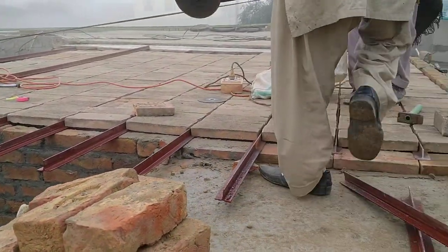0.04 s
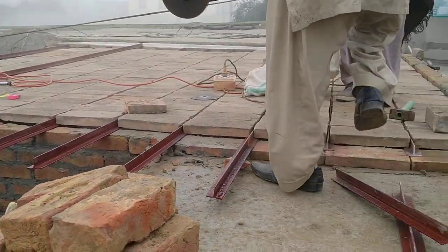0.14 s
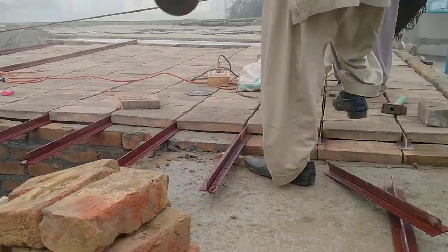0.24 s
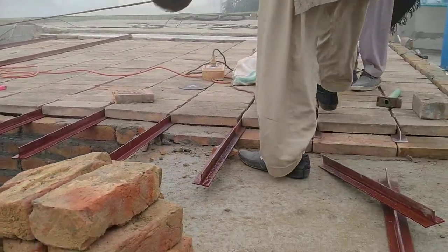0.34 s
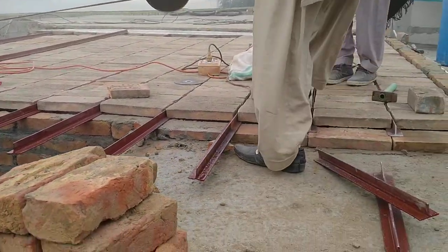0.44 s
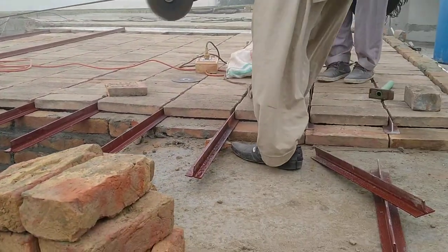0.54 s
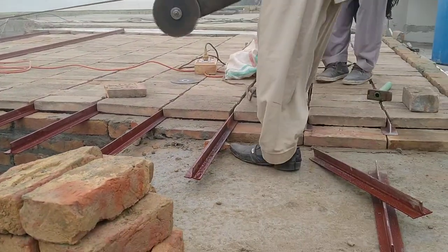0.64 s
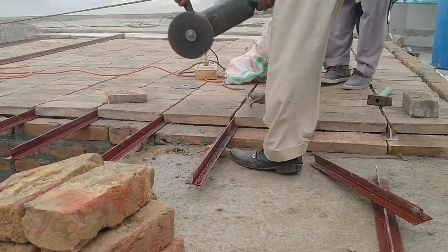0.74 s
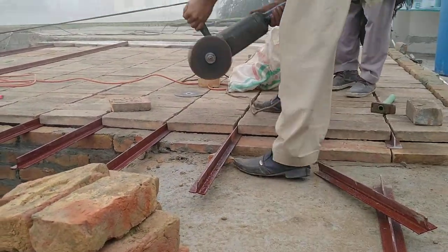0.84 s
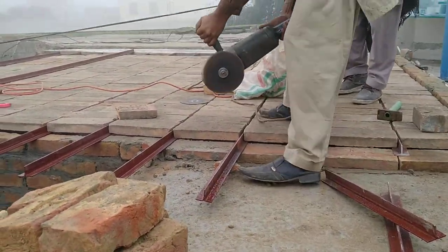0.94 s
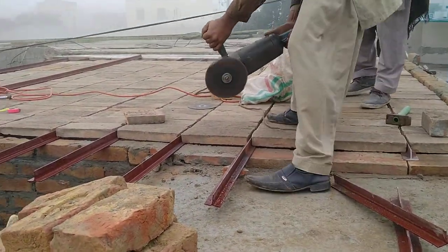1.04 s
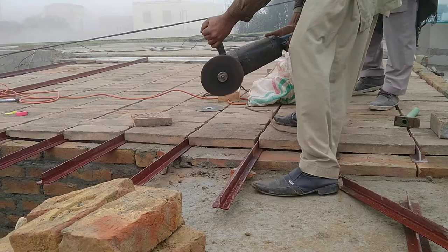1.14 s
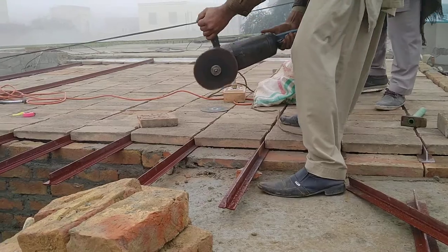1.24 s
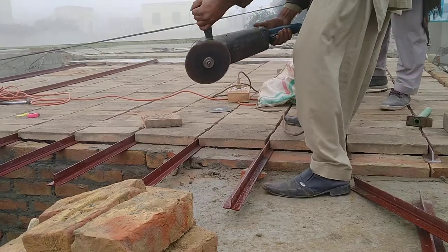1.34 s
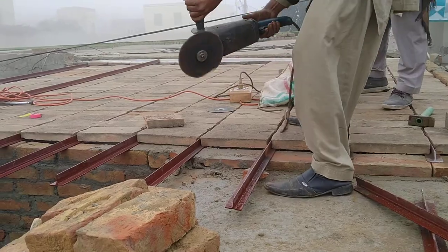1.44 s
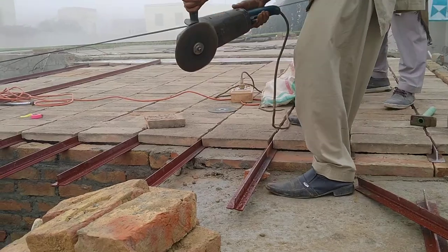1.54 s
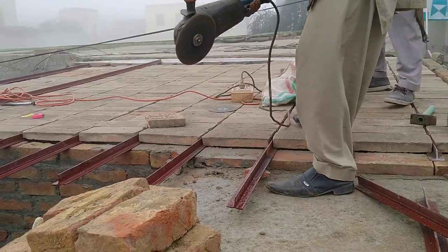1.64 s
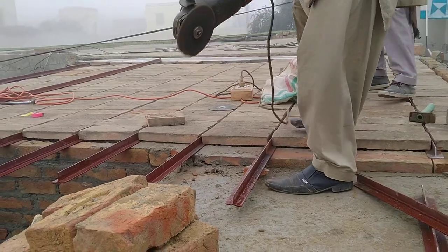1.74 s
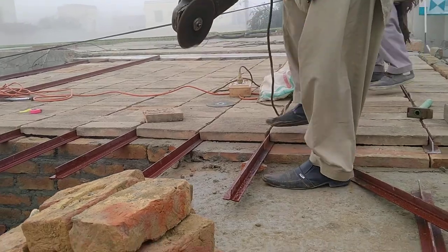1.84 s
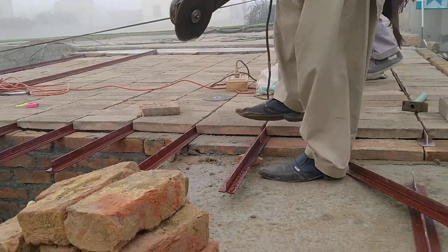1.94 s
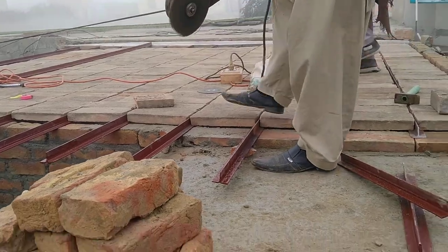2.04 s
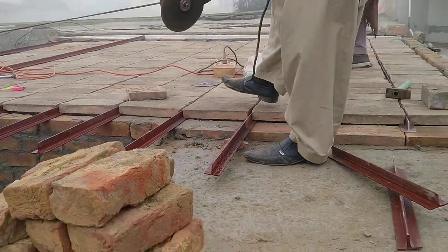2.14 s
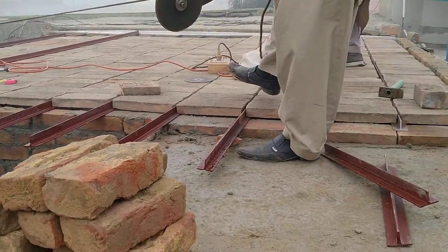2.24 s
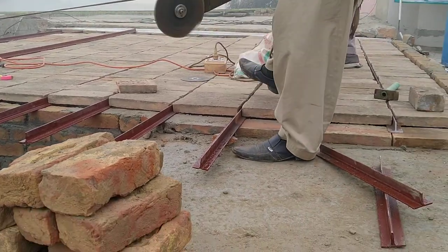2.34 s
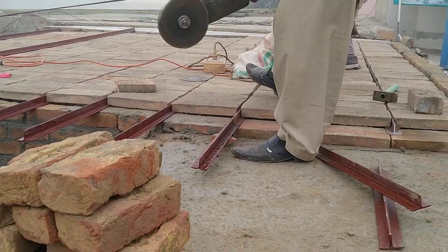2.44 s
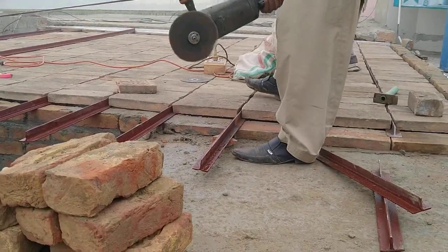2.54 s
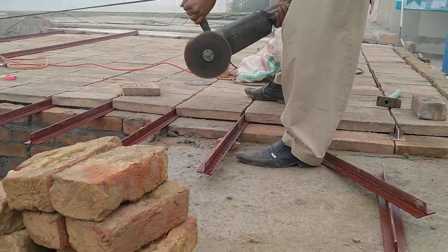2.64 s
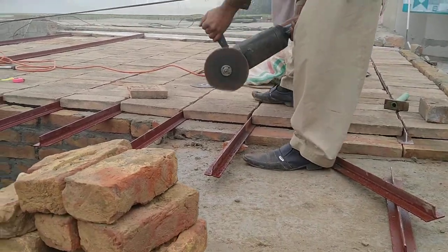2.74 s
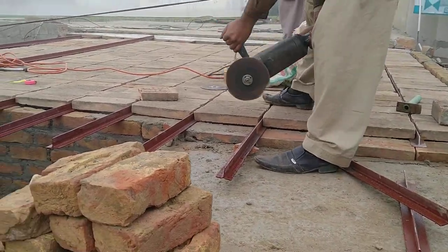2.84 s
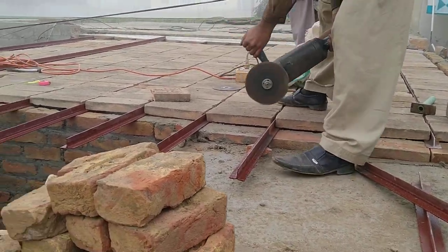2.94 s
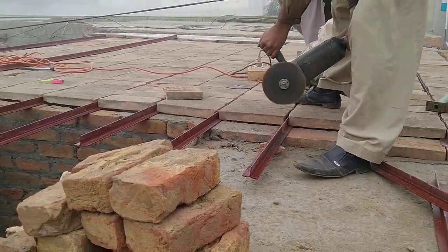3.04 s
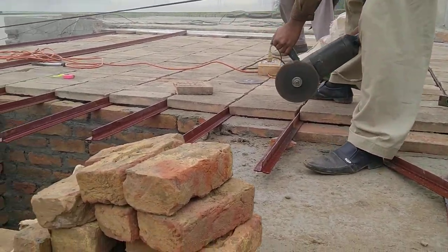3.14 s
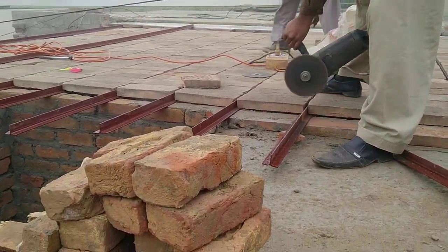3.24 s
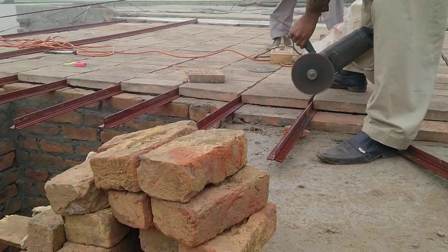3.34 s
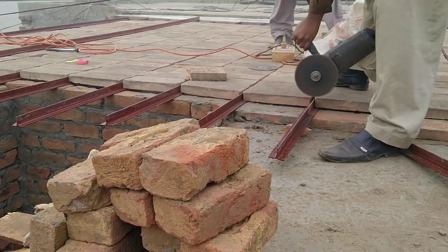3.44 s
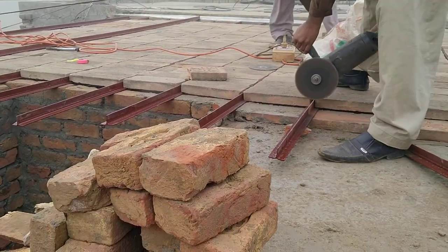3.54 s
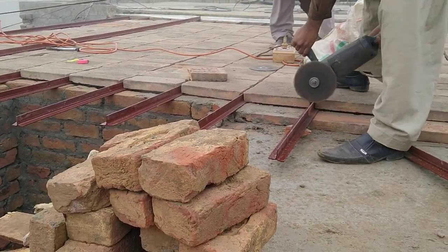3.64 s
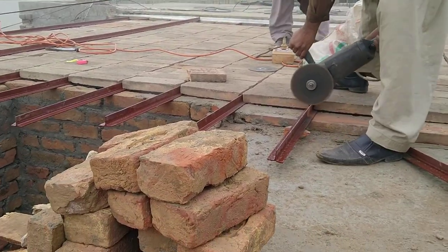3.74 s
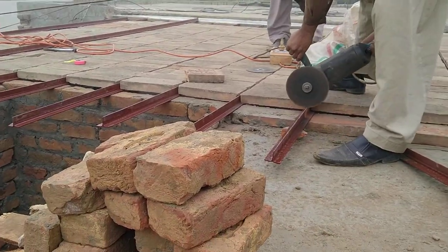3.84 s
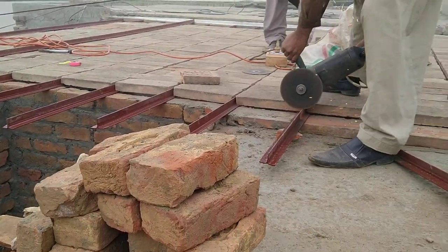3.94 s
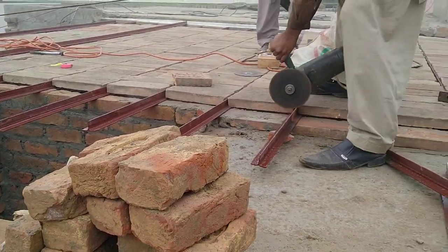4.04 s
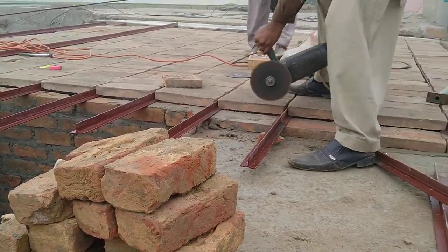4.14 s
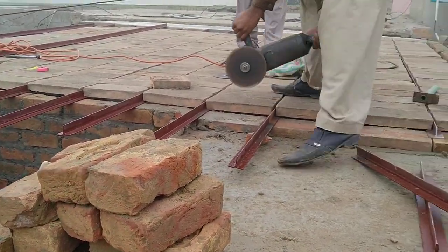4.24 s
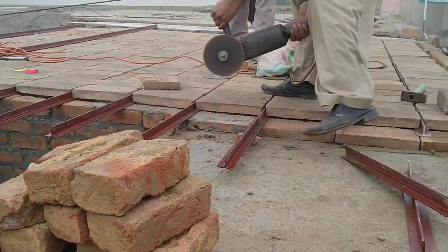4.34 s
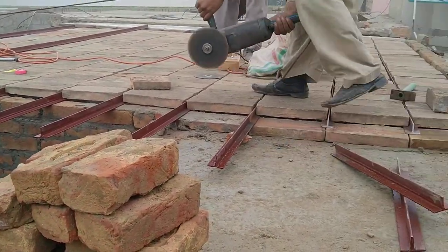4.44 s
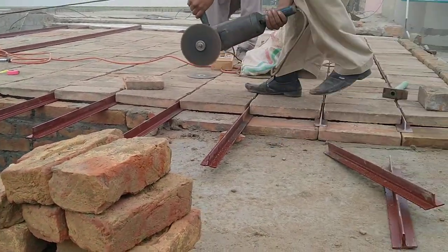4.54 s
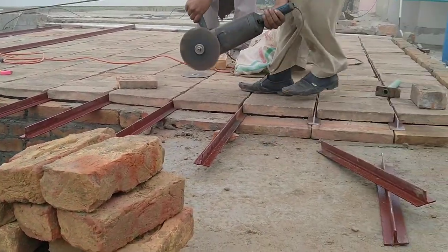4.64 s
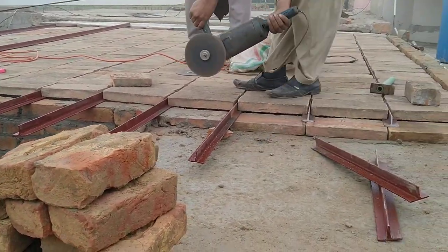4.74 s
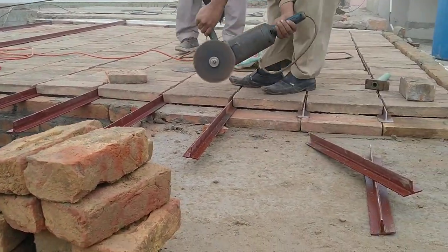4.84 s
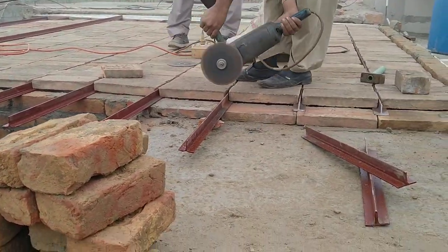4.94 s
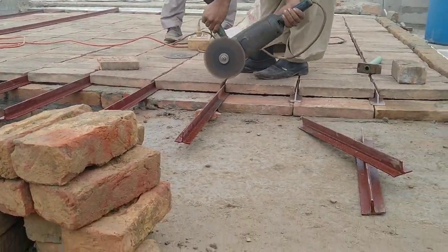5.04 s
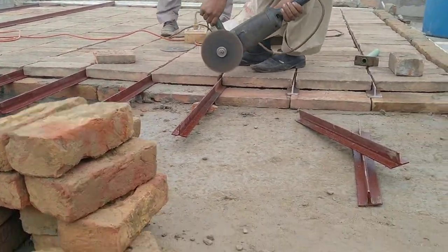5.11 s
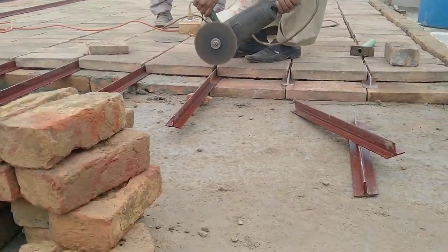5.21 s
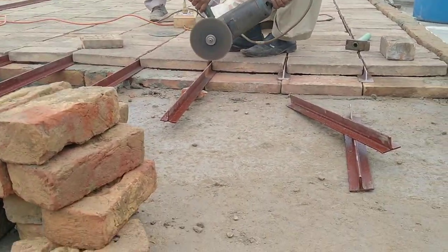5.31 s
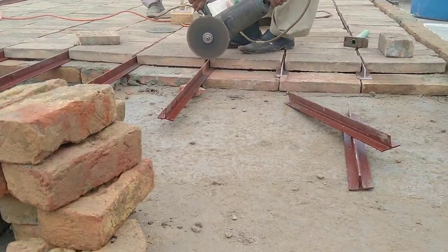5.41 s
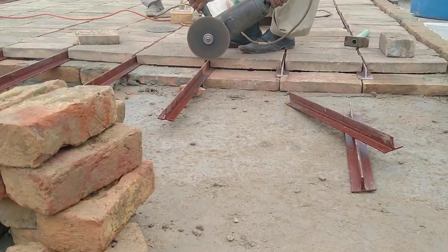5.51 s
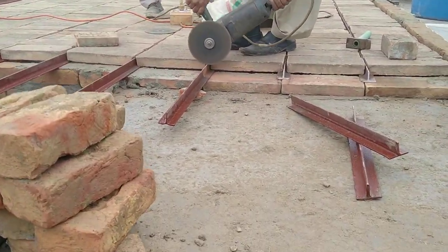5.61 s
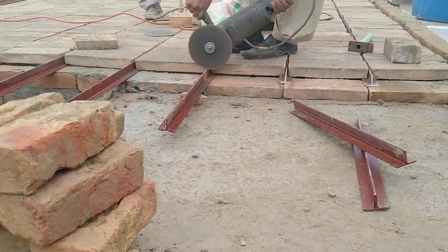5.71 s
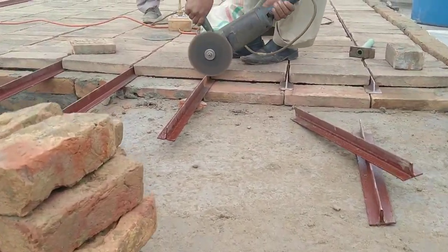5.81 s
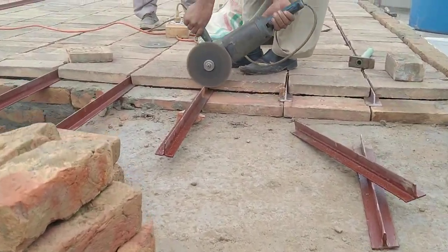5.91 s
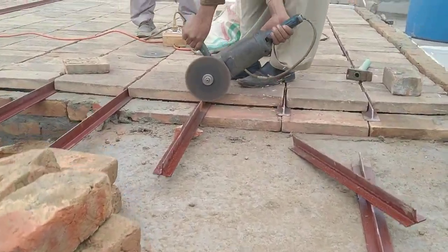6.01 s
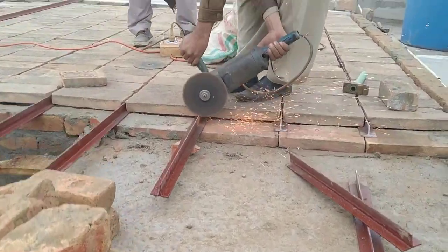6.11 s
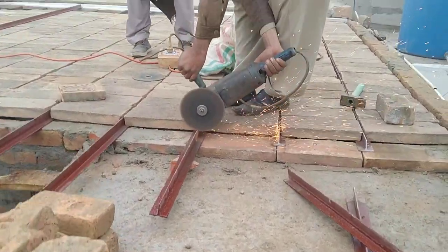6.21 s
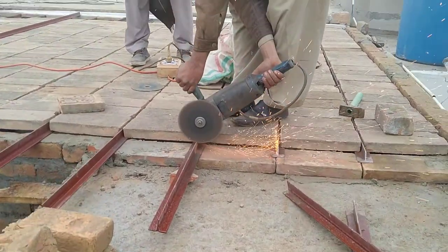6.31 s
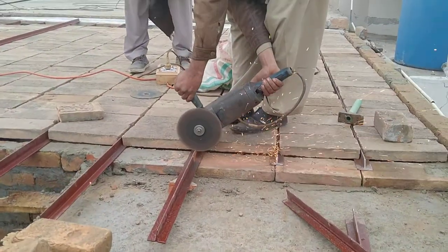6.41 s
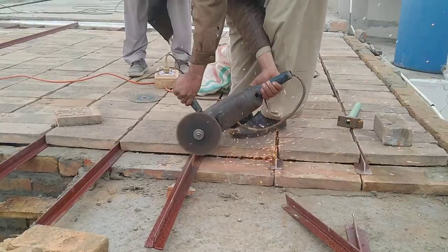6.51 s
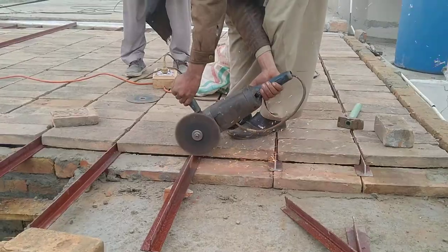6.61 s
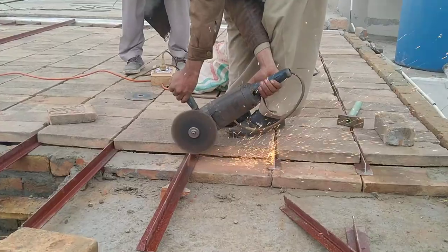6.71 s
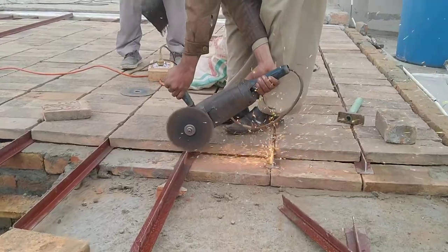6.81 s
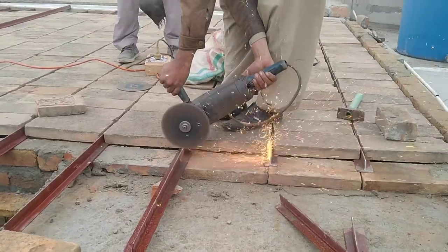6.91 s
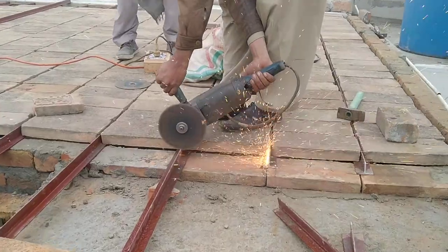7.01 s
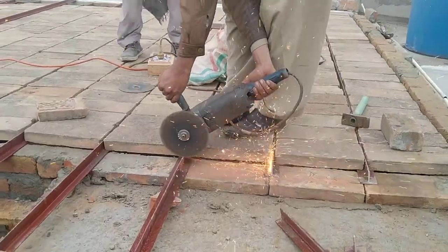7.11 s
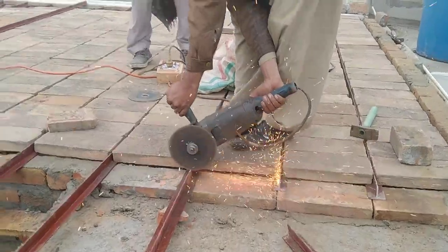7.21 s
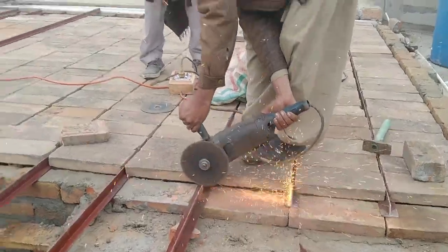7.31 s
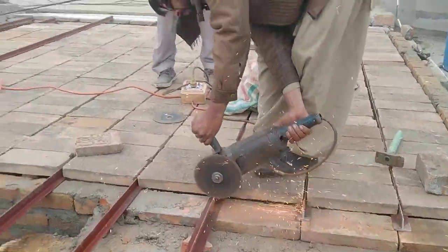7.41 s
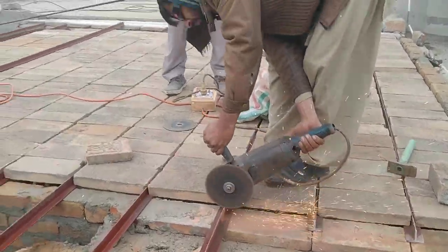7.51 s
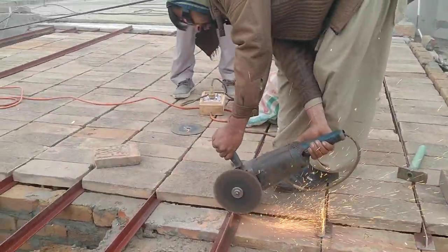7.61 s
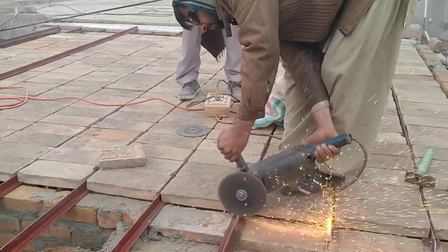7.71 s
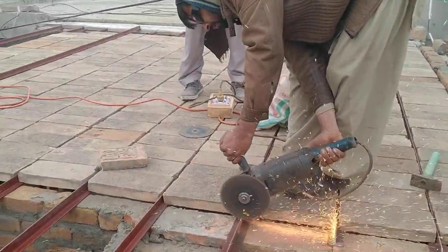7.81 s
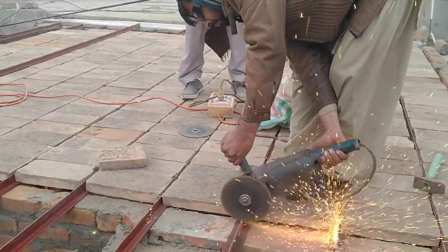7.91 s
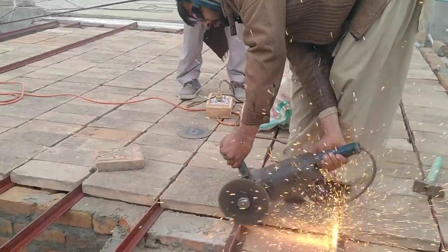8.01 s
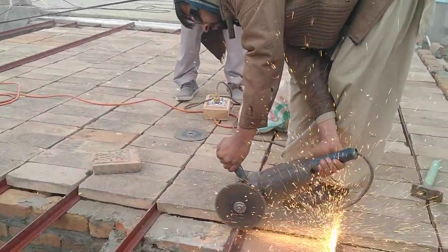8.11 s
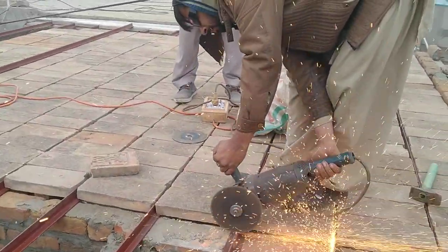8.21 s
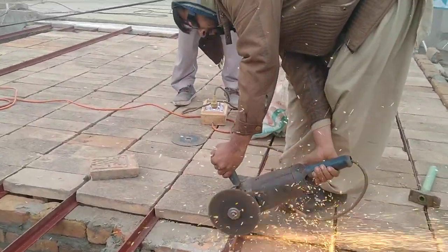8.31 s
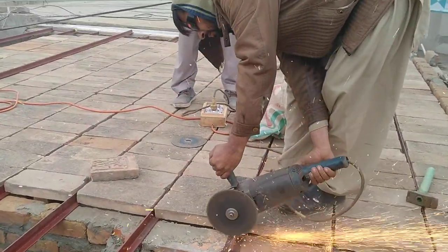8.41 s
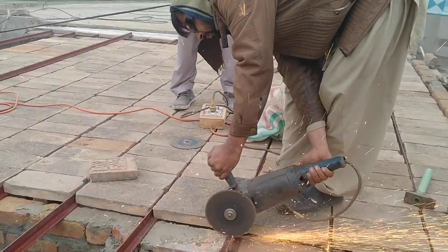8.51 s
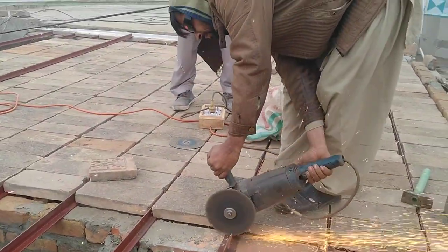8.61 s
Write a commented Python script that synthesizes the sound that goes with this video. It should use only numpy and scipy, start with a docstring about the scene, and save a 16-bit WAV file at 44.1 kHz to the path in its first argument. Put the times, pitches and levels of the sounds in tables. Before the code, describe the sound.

Close outdoor sound of a handheld electric grinder: first a soft falling whine with airy hiss and faint ticking, then an abrupt switch click and rapid loud spin-up. The buzzing gear tone droops when released and climbs when pressed again. Finally the disc meets steel, adding rough crackling abrasion and a metallic ring while the motor labours lower. Wind gusts bump the microphone; a faint low murmur and hiss lie beneath.

```python
"""On an open roof an angle grinder coasts down, is switched on again, is let go and pressed once more,
then bites into a steel girder. The motor whines and growls as it starts, the bevel gear sings and rattles in
the housing, the fan hisses, the disc repeats its roughness every turn, the girder rings, and wind brushes
the microphone. Tones follow the turning of the disc; rattle, fan, steel, growl and wind are shaped noise."""
import sys
import numpy as np
from scipy import signal
from scipy.fft import rfft, irfft, next_fast_len
from scipy.io import wavfile

SR = 44100
rng = np.random.default_rng(int(sys.argv[2]) if len(sys.argv) > 2 else 0)


def to_wav(s):
    """Save 16-bit WAV."""
    ch = np.atleast_2d(s).T  # columns
    pcm = np.round(np.clip(ch, -1, 1) * 32767)  # PCM
    wavfile.write(sys.argv[1], SR, pcm.astype(np.int16))


N = 381906
TIME_S = np.arange(N) / SR

# trigger held: from t/s, to t/s
TRIGGER = [(3.1, 4.104), (5.081, 8.66)]
SWITCH_ON_S = TRIGGER[0][0]
# disc on steel: t/s, grinding level/dB, loss of speed/Hz
CUT = [(5.8, -80, 0), (5.9, -32, -0.5), (6.2, -27.5, 3), (6.5, -27.5, 4), (6.8, -25.5, 3.5),
       (7.38, -24, 8.5), (7.6, -23.5, 8), (7.9, -24.5, 11.5), (8.3, -25.5, 21), (8.57, -24.5, 23)]
# resonances of the disc guard: f/Hz, width/Hz, relative level/dB
GUARD_MODES = [(5900, 800, -6), (6900, 700, -6), (7750, 450, -3), (8300, 420, 0)]
# resonances of the fan and its cover: f/Hz, width/Hz, relative level/dB
FAN_MODES = [(9420, 860, 0.5), (10070, 380, 0.5), (11220, 650, 0.5), (11680, 780, -1.5), (13680, 900, 1),
             (14200, 700, 1), (15400, 470, 4.5)]

TEETH = 52   # gear teeth passing in one turn of the disc
CUTOFF_HZ = 15700   # top of the recorded band
SLACK_START_S, SLACK_END_S = 4.2, 5.35   # the slack gear knocks lightly throughout this stretch


def from_db(db):
    """Gain of a level."""
    return 10 ** (np.asarray(db) / 20)


def rms_one(x):
    """Scale to rms 1."""
    return x / np.sqrt(np.mean(x ** 2) + 1e-20)


def in_time(rows):
    """Columns of a table after its times, joined by straight lines, one value a sample."""
    s, *columns = np.transpose(rows)
    return [np.interp(TIME_S, s, column) for column in columns]


def drift(rate_hz):
    """Slow random wander of spread 1: noise through two equal low-pass poles, made at every 40th sample."""
    r = np.exp(-2 * np.pi * rate_hz * 40 / SR)
    noise = rng.standard_normal(N // 40 + 2002)
    slow = signal.lfilter([1], [1, -2 * r, r * r], noise)[2000:]   # the filter has settled
    return np.interp(np.arange(N) / 40, np.arange(len(slow)), rms_one(slow))


def filtered(x, spectrum):
    """Send a sound through a table of f/Hz and gain/dB, all but silent below its first row."""
    size = next_fast_len(N)
    hz, db = np.transpose(spectrum)
    bins_hz = np.arange(size // 2 + 1) * SR / size
    gain = from_db(np.interp(np.log(bins_hz + 1), np.log(hz), db, left=-90))
    return irfft(rfft(x, size) * gain, size)[:N]


def colour(x, spectrum):
    """Give a flat sound the spectrum of a table; rms 1."""
    return rms_one(filtered(x, spectrum))


def resonate(x, modes, twice, patchy_db, tilt_db=0):
    """Parallel resonances, each swelling on its own, tilted per octave about the middle one; rms 1."""
    out = 0
    middle_hz = modes[len(modes) // 2][0]
    for k, (hz, width_hz, db) in enumerate(modes):
        r = np.exp(-np.pi * width_hz / SR)
        b = (1 - r * r) / 2 * np.array([1, 0, -1])
        a = [1, -2 * r * np.cos(2 * np.pi * hz / SR), r * r]
        rung = signal.lfilter(b, a, x)
        if twice:
            rung = signal.lfilter(b, a, rung)
        lean_db = tilt_db * np.log2(hz / middle_hz)
        swell_db = patchy_db * (0.54 * drift(2.12) + 0.39 * drift(9.9)) if patchy_db else 0
        sign = 1 if twice else (-1) ** k   # neighbours add up between their peaks
        out = out + sign * from_db(db + lean_db + swell_db) * rms_one(rung)
    return rms_one(out)


def once_a_turn(turns, crowding):
    """An off-centre wheel loads one spot of every turn; mean power 1 over a turn."""
    return np.exp(crowding * np.cos(2 * np.pi * turns)) / np.sqrt(np.i0(2 * crowding))


def knocks(events, t60):
    """Short bursts of noise at (t/s, level/dB), falling 60 dB in t60 seconds."""
    clicks = np.zeros(N)
    clicks[[round(s * SR) for s, db in events]] = from_db([db for s, db in events])
    envelope = signal.lfilter([1], [1, -from_db(-60 / (t60 * SR))], clicks + 1e-18)
    return envelope * rng.standard_normal(N)


def disc_speed():
    """Turns a second: pulled up while the trigger is held, braked when it is let go, dragged down by the cut."""
    start_hz, step_s = 84.57, .002
    free_hz, spin_up_s = 131.74, .422   # powered, the disc closes in on its free speed
    # unpowered, bearings and fan brake it (fan drag as at 100 turns a second)
    friction_hz_per_s, drag_hz_per_s, drag_power = 14.9, 12.79, 4.507
    times = np.arange(0, N / SR + step_s, step_s)
    held = 0
    for on, off in TRIGGER:
        pressed = np.clip((times - on) / (2 * step_s), 0, 1)
        released = np.clip((times - off) / (2 * step_s), 0, 1)
        held = held + pressed - released
    hz, speeds = start_hz, []
    for power in held:
        speeds.append(hz)
        pull = (free_hz - hz) / spin_up_s
        braking = friction_hz_per_s + drag_hz_per_s * (hz / 100) ** drag_power
        hz += step_s * (power * pull - (1 - power) * braking)
    _, loss_hz = in_time(CUT)
    return np.interp(TIME_S, times, speeds) - loss_hz


def housing(turns, speed):
    """Gear rattle, throbbing with the turn, rings in shell, head and guard; the fan hisses above."""
    # loudness of the shell, jumping when the motor is switched on, then surging and dipping: t/s, level/dB
    facing = [(0, -33), (.5, -34), (.9, -33.5), (1.0, -36), (1.7, -39.5), (2.0, -45), (2.4, -45.5),
              (3.09, -44.5), (3.105, -24), (3.45, -21.5), (3.66, -23), (3.9, -26.5), (4.15, -26),
              (4.23, -26.5), (4.31, -32.5), (4.43, -29), (4.69, -29.5), (4.74, -24), (5.05, -24.5),
              (5.21, -23), (5.27, -29), (5.42, -24), (5.53, -26.5), (5.81, -23), (6.12, -27.5),
              (6.4, -24.5), (6.69, -28.5), (6.85, -26.5), (7.3, -29), (7.95, -28), (8.06, -26.5),
              (8.21, -33.5), (8.33, -26), (8.66, -34)]
    # which part faces the microphone: t/s, shell tilt/dB per octave, gear head tilt/dB per octave,
    # head over shell/dB and guard over shell/dB, both at 100 turns a second
    aspect = [(0, -4, 3.5, 5, -8), (.8, 4, -2, 3, 0), (1.3, 8, -5.5, 4, -1), (1.8, 9, 7, 11.5, 12.5),
              (2.25, 10.5, 1, 14.5, 19.5), (2.9, 8.5, -18, 9.5, 5), (3.2, 7, 4, 2.5, -1.5),
              (3.6, -2, 3.5, 1, -4.5), (4.1, -4, -0.5, -3.5, -10.5), (4.3, 3, 5, 3, -0.5),
              (4.9, 1, 7, 3.5, -1.5), (5.7, -2, 5.5, -2, -9), (6.4, 1.5, 4.5, -3, -6.5),
              (7.5, -1.5, -0.5, 1.5, -5), (8.66, -4.5, -1, -3.5, -6.5)]
    # resonances of the motor shell: f/Hz, width/Hz, relative level/dB
    shell_modes = [(340, 356, -13), (624, 427, -6), (905, 190, -7), (1481, 394, 2), (1684, 790, 0)]
    # resonances of the gear head: f/Hz, width/Hz, relative level/dB
    head_modes = [(2252, 214, 4), (2610, 1030, 5.5), (3498, 520, 3), (4250, 440, -2.5)]
    slack_tilt, usual_tilt = 2, -3.5   # dB per octave: the guard rings higher while the gear is slack

    shell_db, = in_time(facing)
    shell_tilt, head_tilt, head_over_db, guard_over_db = in_time(aspect)
    octaves = np.log2(speed / 100)
    # upper parts gain on the shell with speed; the fan partly follows the guard's turning
    head_db = shell_db + head_over_db + 6.5 * octaves
    guard_db = shell_db + guard_over_db + 12.5 * octaves
    fan_db = shell_db - 4.5 + 0.64 * guard_over_db + 11 * octaves
    guard_tilt, = in_time([(SLACK_START_S - .1, usual_tilt), (SLACK_START_S, slack_tilt),
                           (SLACK_END_S, slack_tilt), (SLACK_END_S + 0.18, usual_tilt)])
    shake = from_db(1.0 * drift(50))

    def rattle(crowding):
        """Noise bunched once a turn."""
        return rng.standard_normal(N) * shake * once_a_turn(turns, crowding)

    shell = resonate(rattle(0.12), shell_modes, False, patchy_db=1.4, tilt_db=shell_tilt)
    head = resonate(rattle(0.16), head_modes, False, patchy_db=1.06, tilt_db=head_tilt)
    guard = resonate(rattle(0.43), GUARD_MODES, True, patchy_db=2.5, tilt_db=guard_tilt)
    fan = resonate(rattle(0.38), FAN_MODES, True, patchy_db=5.0)
    return from_db(shell_db) * shell + from_db(head_db) * head + from_db(guard_db) * guard + from_db(fan_db) * fan


def hum_and_song(turns, speed):
    """Unbalance hums on low multiples of the turn; meshing teeth sing, swelling near two spots of the turn."""
    # tones of the running tool: t/s, hum level/dB, gear song level/dB,
    # second partial against the first/dB, song crowded into one spot of the turn/0-1
    tones = [(3.114, -53, -40, -15, .3), (3.27, -55, -29, -24, 0.1), (3.52, -48, -30, -9.5, .95),
             (3.71, -46, -26, -10, 0.6), (4.15, -42.5, -34, -14, 0.4), (4.4, -42, -33.5, -4, 0.56),
             (5.05, -58, -33, -25, 0.4), (5.14, -48, -32, -7, .7), (5.3, -52.5, -36, -14, 0.7),
             (5.65, -44, -35.5, -11, 0.25), (6.1, -41.5, -37, 3.5, 1), (6.5, -41, -37.5, 2, 0.5),
             (6.8, -41, -34.5, 2, 0.7), (7.38, -42, -44, 5, 0.6), (7.75, -41, -34, -11, 0.3),
             (7.9, -48.5, -46, -8, .6), (8.66, -49, -40.5, 3, 0.9)]
    # partials of the hum: multiple of the turn, relative level/dB
    hum_partials = [(1, -10), (2, 0), (4, -8), (5, -8), (6, -12), (7, -10), (8, -10), (9, -11)]
    # how well the housing lets the gear song out: f/Hz, gain/dB
    gearbox_gain = [(1500, -8), (2800, -21), (3350, 4), (3800, -7), (4350, 1.5), (4900, -9), (5500, -5.5),
                    (6100, 2), (7000, 6), (8500, -22), (10000, 4), (12000, -5), (13400, 1.5), (15500, -2)]

    silent_start = (SWITCH_ON_S, -90, -90, *tones[0][3:])
    hum_db, song_db, second_db, crowd = in_time([silent_start, *tones])
    hum = np.zeros(N)
    for k, db in hum_partials:
        hum += from_db(hum_db + db + 1.6 * drift(4)) * np.sin(2 * np.pi * k * turns)
    # the third multiple fades with speed
    rise_db, = in_time([(SWITCH_ON_S, -60), (3.6, 0)])
    third_db = -47 - 0.16 * (speed - 100) + rise_db
    hum += from_db(third_db + 1.5 * drift(6)) * np.sin(2 * np.pi * 3 * turns)

    # uneven meshing pushes the song's phase to and fro within each turn
    wobble = 2.0 * np.sin(2 * np.pi * turns + 1.46) + 0.69 * np.sin(2 * np.pi * 3 * turns) + 0.38 * drift(59.9)
    load = once_a_turn(turns, 5 * crowd) + 0.58 * once_a_turn(turns - .4, 4.4)
    angle = 2 * np.pi * TEETH * turns
    first = np.sin(angle + (0.47 + 1.5 * crowd) * wobble)
    second = from_db(second_db) * np.sin(2 * angle + 1.4 * wobble)
    song = from_db(song_db + 2.0 * drift(18)) * load * (first + second)
    return np.sqrt(2) * (hum + filtered(song, gearbox_gain))


def whine(turns, speed):
    """Partials of the coasting motor, half a cycle a gear tooth, flickering and blurred by play in the bearings."""
    # partials, as multiples of half the tooth rate
    multiples = [.79, 1, 2, 3, 3.5, 4, 5, 6, 7, 8, 9, 10, 11, 12]
    # each of these partials: relative level/dB at 60 turns a second, slope/dB per octave of speed
    partial_levels = [(4, 0), (2, 0), (6, -3), (6.5, -3), (-9, 0), (5, 9), (3, 5), (5.5, 3), (2.5, -4),
                      (-1, 5), (-3, 5), (-4, 2), (-4, 2), (-7, 2)]
    # how well the housing lets a tone out: f/Hz, gain/dB
    outlet_gain = [(700, -22), (1600, -3), (2000, -10), (2320, 6), (2550, -2), (3050, 5), (3500, -2),
                   (3800, 3), (4300, -6), (4900, -15), (5600, -6), (6200, -3), (7300, 6), (8200, 5),
                   (9500, -11), (12000, -5), (15000, 0)]

    db, = in_time([(SWITCH_ON_S, -51.5), (SWITCH_ON_S + .03, -90)])   # gone once the tool is switched on
    end = int((SWITCH_ON_S + .1) * SR)
    angle = np.pi * TEETH * turns + .15 * drift(60)
    octaves = np.log2(speed / 60)
    out = np.zeros(N)
    for k, (level_db, slope_db) in zip(multiples, partial_levels):
        partial_db = level_db + slope_db * octaves + 2.5 * drift(3) + 2 * drift(15)
        in_band = k * speed[:end] * TEETH / 2 < CUTOFF_HZ
        out[:end] += from_db(partial_db[:end]) * in_band * np.sin(k * angle[:end])
    return from_db(db) * filtered(out, outlet_gain)


def squeal(turns):
    """One high multiple of the turn sounds for a moment as the motor gathers speed."""
    at_s, half_s, multiple = 3.28, .025, 90.5
    swell = np.exp(-((TIME_S - at_s) / half_s) ** 2)
    return from_db(-30) * swell * np.sin(2 * np.pi * multiple * turns + .4 * drift(60))


def backlash():
    """The loudest knocks ring in guard and fan cover, an uneven run of lighter ones in the top of the guard."""
    # loudest knocks of the gear: t/s, relative level/dB
    loud_knocks = [(3.5955, -1), (3.93, -2), (4.708, -5), (4.912, -7), (5.1773, -2), (5.3017, -6),
                   (6.9071, -6)]
    gap_s = .04   # typical time between light knocks
    chance = rng.standard_normal((60, 2))
    times = SLACK_START_S + gap_s * np.cumsum(np.exp(.3 * chance[:, 0]))
    light_knocks = [(s, 1.6 * z) for s, z in zip(times, chance[:, 1]) if s < SLACK_END_S]
    loud = resonate(knocks(loud_knocks, 0.01), [*GUARD_MODES, *FAN_MODES], True, patchy_db=0)
    light = resonate(knocks(light_knocks, 0.015), GUARD_MODES[2:], True, patchy_db=0)
    return from_db(-51) * loud + from_db(-45) * light


def switch():
    """The switch snaps on the first press: one burst of noise that dies away."""
    return knocks([(SWITCH_ON_S + .003, -17.5)], 0.036)


def off_the_slabs(x):
    """Direct sound plus one dull echo off the roof slabs, whose lag follows the tool's height."""
    # echo: t/s, lag/ms, strength/0-1
    bounce = [(0, 1.11, 0.45), (1, 1.23, 0), (2, 1.18, 0.15), (3, 1.12, 0.42), (4, 1.4, 0.23),
              (4.7, 1.33, 0.26), (5.2, 1.03, 0.26), (5.7, 1.05, 0.48), (6.3, 0.93, 0.05),
              (8.66, 0.86, 0.43)]
    lag_ms, strength = in_time(bounce)
    dull = signal.sosfilt(signal.butter(2, 3000, fs=SR, output="sos"), x)
    echo = np.interp(np.arange(N) - lag_ms * SR / 1000, np.arange(N), dull)
    return x + strength * echo


def loose_guard():
    """The guard chatters faintly early in the coast-down: scattered ticks in one high resonance."""
    # chatter of the loose guard: t/s, level/dB
    chatter = [(0, -48.5), (1.0, -68), (1.85, -65), (2.1, -82)]
    struck = rng.random(N) < 45 / SR   # about 45 ticks a second
    ticks = struck * from_db(4 * rng.standard_normal(N)) + 1e-18
    return from_db(in_time(chatter)[0]) * resonate(ticks, [(10000, 400, 0)], True, patchy_db=0)


def grinding(turns):
    """Grit tears steel: the rim's own unevenness comes round every turn and wears, fresh grains crackle over it."""
    # spectrum of the tearing: f/Hz, density/dB per Hz
    grit_spectrum = [(88, -35), (150, -21), (209, -25), (244, 1.5), (297, -1.5), (1210, 0.5), (1530, -16),
                     (1620, 3.5), (2130, -1), (4060, -6.5), (4930, -5), (7880, 8.5), (9390, -9.5),
                     (13300, 0.5), (15900, -25)]
    repeating = .42   # share of the power that comes round each turn
    db, _ = in_time(CUT)
    spot = (turns % 1) * 320
    worn = np.zeros(N)
    for rim in rng.standard_normal((3, 321)):   # wear: three rim profiles drift in and out
        worn += drift(1.66) * np.interp(spot, np.arange(321), rim)
    worn = signal.sosfilt(signal.butter(2, 1500, "high", fs=SR, output="sos"), worn)   # fine bumps only
    crackle = from_db(5.3 * np.minimum(rng.exponential(1, N), 4))
    grains = rng.standard_normal(N) * crackle * once_a_turn(turns, 0.043)
    tearing = np.sqrt(repeating) * rms_one(worn) + np.sqrt(1 - repeating) * rms_one(grains)
    return from_db(db + 0.76 * drift(20)) * colour(tearing, grit_spectrum)


def girder(turns):
    """The disc's high spot knocks the steel once a turn; its modes pick out multiples of the turn."""
    # resonances of the steel section: f/Hz, width/Hz, relative level/dB
    steel_modes = [(1356, 63, 4.5), (1541, 25, 8), (1693, 44, -0.5), (2075, 72, 8.5), (2100, 42, -6),
                   (2725, 24, 3.5), (2914, 57, -8)]
    db, _ = in_time(CUT)
    taps = np.diff(np.floor(turns), prepend=0) * from_db(0.71 * drift(35))
    taps = taps + 0.023 * rng.standard_normal(N)
    return from_db(db - 8.5) * resonate(taps, steel_modes, True, patchy_db=3.0)


def wind():
    """Lumpy rumble on the microphone: low noise, swelling in gusts."""
    # steady wind: t/s, level/dB
    wind_level = [(0, -46.5), (1.4, -46), (2.7, -45), (3.5, -48), (4.0, -55), (4.5, -43), (5.7, -55),
                  (6.0, -44), (6.7, -45), (7.2, -39.5), (8.66, -40.5)]
    # gusts: t/s, rise/dB, half length/s
    gusts = [(1.47, 4, 0.14), (2.14, 2, .1), (5.28, 8, .15), (6.983, 9.5, 0.058), (8.104, 4, .06),
             (8.35, 9.5, .1)]
    # spectrum of the rumble: f/Hz, density/dB per Hz
    rumble_spectrum = [(7.1, -32), (12, 12), (16, 1), (32, -5.5), (81, -6), (112, -8.5), (200, -15),
                       (260, -24), (440, -120)]
    swell_db = sum(db * np.exp(-((TIME_S - s) / half_s) ** 2) for s, db, half_s in gusts)
    level_db = in_time(wind_level)[0] + swell_db + 1.5 * drift(7.7)
    return from_db(level_db) * colour(rng.standard_normal(N), rumble_spectrum)


def murmur_and_growl():
    """Low murmur of the surroundings, with the motor's growl as it starts: shaped noise."""
    # murmur and start-up growl: t/s, level/dB
    murmur_level = [(0, -46), (1.6, -45.5), (2.3, -43), (3.1, -44), (3.45, -35), (3.6, -47.5), (5.9, -55),
                    (6.1, -48), (8.66, -40)]
    # spectrum of both: f/Hz, density/dB per Hz
    murmur_spectrum = [(53, -18), (90, -19.5), (217, 8.5), (306, -3), (372, 3), (429, -4.5), (905, 1.5),
                       (1200, -1.5), (1560, -29), (2640, -120)]
    return from_db(in_time(murmur_level)[0]) * colour(rng.standard_normal(N), murmur_spectrum)


def microphone_hiss():
    """Faint even hiss of the microphone: white noise."""
    return from_db(-51) * rng.standard_normal(N)


def scene():
    """Tool, steel, wind and surroundings; one turning disc times the tool and the steel."""
    speed = disc_speed()
    turns = np.cumsum(speed) / SR
    body = off_the_slabs(housing(turns, speed) + backlash() + switch())
    tones = hum_and_song(turns, speed) + whine(turns, speed) + squeal(turns)
    steel = grinding(turns) + girder(turns)
    background = wind() + murmur_and_growl() + microphone_hiss()
    return (body + tones + loose_guard() + steel + background)[None]


def record(dry):
    """Peaks are rounded, the top is cut."""
    rounded = .8 * np.tanh(dry / .8)
    return signal.sosfilt(signal.ellip(12, .3, 75, CUTOFF_HZ, fs=SR, output="sos"), rounded)


dry = scene()
out = record(dry)
to_wav(out)
```